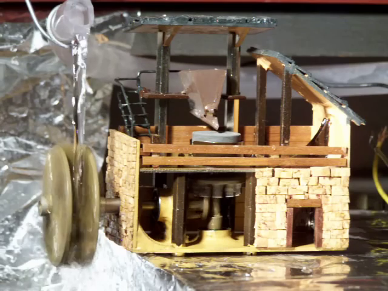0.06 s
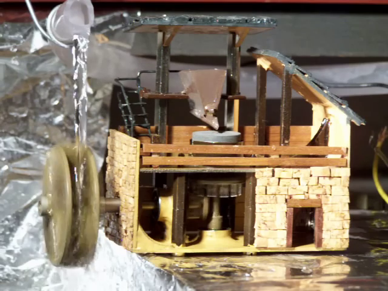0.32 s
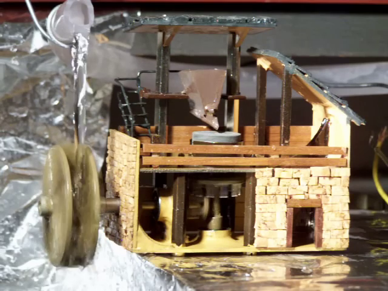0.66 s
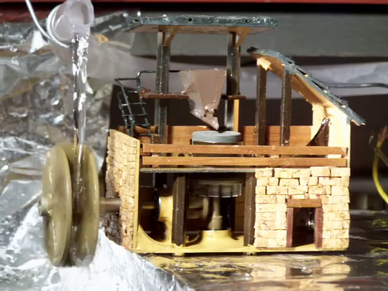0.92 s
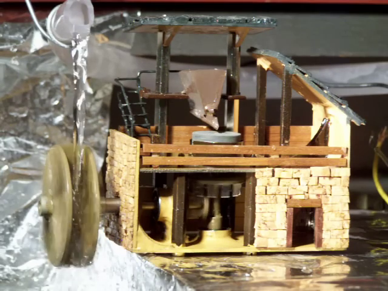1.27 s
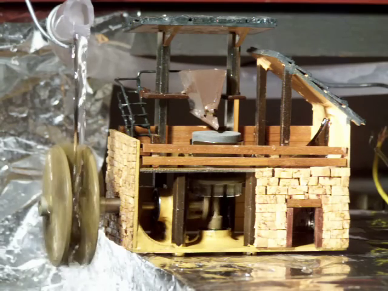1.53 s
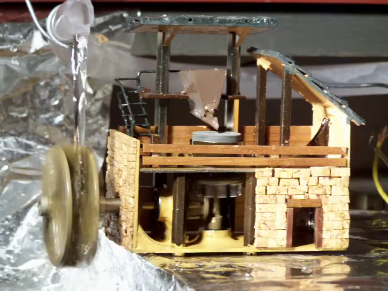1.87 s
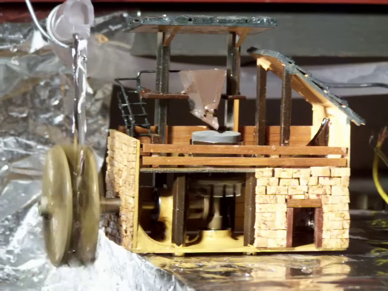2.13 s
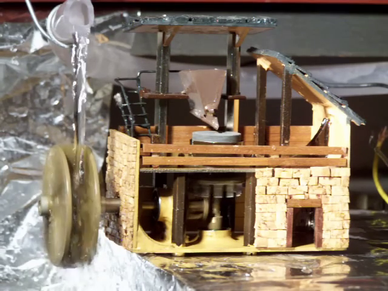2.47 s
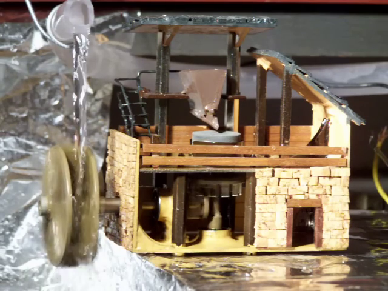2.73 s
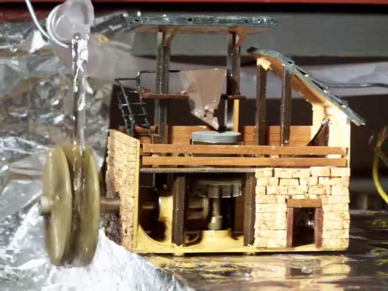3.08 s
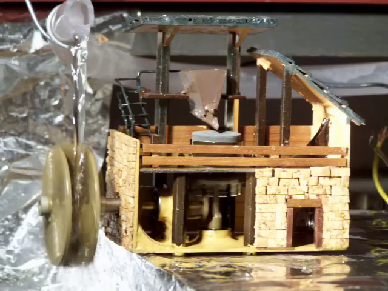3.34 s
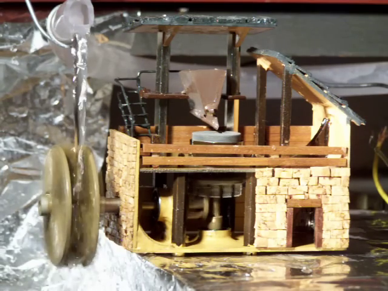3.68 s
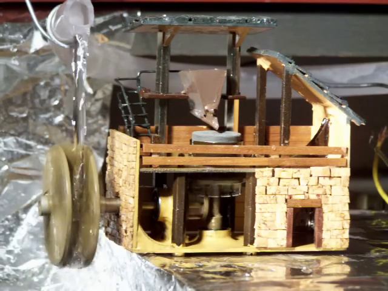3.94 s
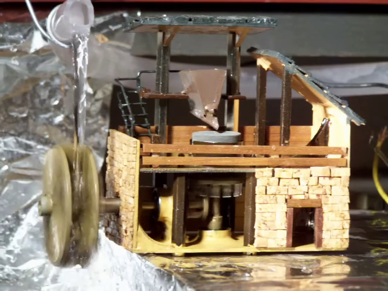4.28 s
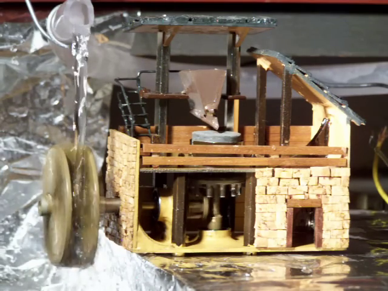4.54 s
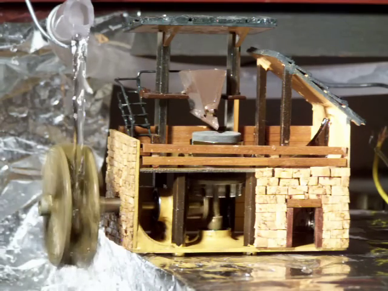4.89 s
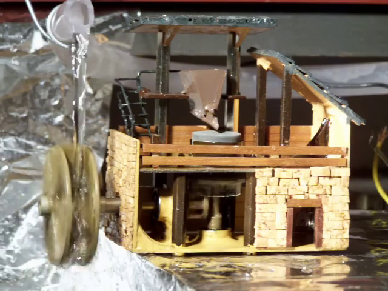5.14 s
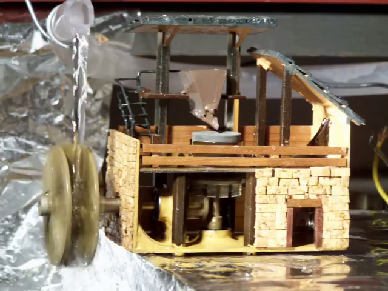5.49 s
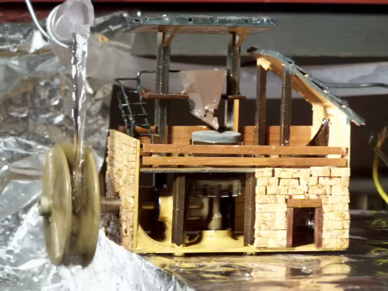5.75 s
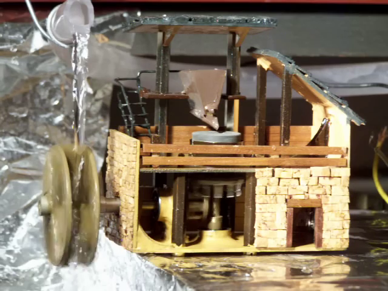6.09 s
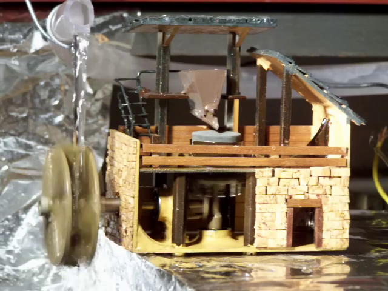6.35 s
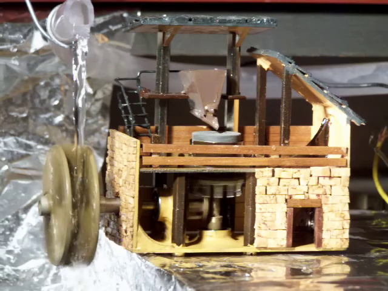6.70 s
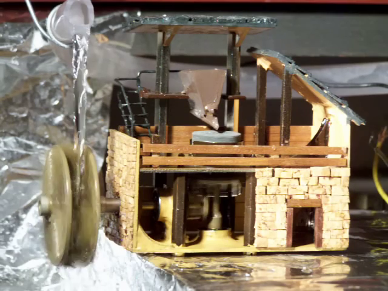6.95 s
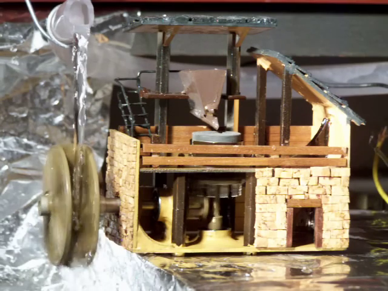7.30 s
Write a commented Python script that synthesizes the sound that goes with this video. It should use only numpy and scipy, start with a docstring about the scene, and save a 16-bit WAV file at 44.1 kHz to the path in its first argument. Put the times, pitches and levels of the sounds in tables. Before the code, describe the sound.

From the first moment, a thin stream of tap water splashes onto a small model mill wheel turning in a sink. The paddles break it into quick, bright, wet slaps, in a pattern that repeats about every 0.6 seconds. On each turn the axle gives a light knock with a faint, brief gear rattle. High bubble plinks and a fine fizz run through the splashing, with clearer plinks near 1.2, 2.5, 3.7, 4.4 and 6 seconds. Small rising gurgles appear around 1.3, 3.4, 5.6 and 6.2 seconds, and heavier blobs occasionally spill into the puddle. The wheel slows very slightly around 5 seconds but keeps going until the end, at roughly 7.5 seconds. Everything sounds close, with a slight basin ring, short echoes from the sink and nearby walls, and a very faint low room rumble.

```python
"""Water splashes in a quick, repeating rhythm: a thin stream from a tap turns a model mill in a sink.
Twelve unequal paddles chop the stream into the same pattern of slaps on every turn.
The falling water traps bubbles that plink, gurgle and fizz in the puddle.
The mill stands on foil, and its axle knocks once a turn.
The sink and nearby walls add short echoes, and the room rumbles faintly underneath."""
import sys
import numpy as np
from scipy import signal
from scipy.fft import rfft, irfft, next_fast_len
from scipy.io import wavfile
from scipy.ndimage import map_coordinates

SR = 44100
rng = np.random.default_rng(int(sys.argv[2]) if len(sys.argv) > 2 else 0)


def transcribe(signal):
    """Save signal, clipped to [-1, 1], as a 16-bit WAV file at the path in sys.argv[1]."""
    frames = np.atleast_2d(signal).T
    limited = np.clip(frames, -1, 1)
    pcm = np.round(limited * 32767).astype(np.int16)
    wavfile.write(sys.argv[1], SR, pcm)


N = 332073

# The wheel turns unevenly. One row a turn: when the stream meets three lead paddles, and the knock.
# Columns: first_paddle_s, second_paddle_s, third_paddle_s, knock_db
WHEEL_TURNS = [(0.017, 0.085, 0.375, -22.5), (0.583, 0.659, 0.968, -23), (1.186, 1.266, 1.559, -22),
               (1.761, 1.84, 2.123, -23.5), (2.325, 2.422, 2.688, -22.5), (2.9, 2.974, 3.267, -22.5),
               (3.459, 3.544, 3.811, -22), (4.016, 4.09, 4.374, -22.5), (4.577, 4.656, 4.985, -21.5),
               (5.242, 5.307, 5.638, -23), (5.866, 5.953, 6.267, -23.5), (6.487, 6.579, 6.865, -23),
               (7.076, 7.17, 7.457, -21.5)]
# The larger bubbles trapped by falling drops. Columns: start_s, pitch_hz, level_db
BIG_BUBBLES = [(0.146, 5000, -24.5), (0.209, 6530, -24.5), (0.45, 2400, -28), (0.459, 6200, -18.5),
               (0.516, 2080, -20), (0.712, 4610, -16.5), (0.874, 4800, -19), (1.012, 4380, -24.5),
               (1.2035, 6100, -23), (1.2261, 3200, -12), (1.2645, 794, -27), (1.271, 4900, -23),
               (1.365, 4000, -15.5), (1.398, 3660, -15), (1.412, 3480, -17.5), (1.5, 3570, -18.5),
               (1.903, 4210, -15.5), (1.982, 3120, -20), (2.121, 5450, -24.5), (2.333, 1464, -28),
               (2.486, 2093, -13), (2.659, 5280, -15), (2.691, 1460, -21), (2.774, 4830, -16.5),
               (3.301, 3450, -18.5), (3.401, 2430, -21), (3.461, 2940, -14), (3.584, 6140, -19.5),
               (3.683, 3500, -12.5), (3.741, 2070, -21), (3.812, 1010, -29), (3.862, 1360, -27.5),
               (3.932, 5970, -23), (4.382, 5570, -17.5), (4.445, 3620, -9.5), (4.625, 3700, -17),
               (4.802, 5090, -21.5), (4.9686, 4170, -19.5), (4.995, 2630, -22), (5.063, 3650, -22),
               (5.104, 3530, -23), (5.272, 3920, -20), (5.456, 2075, -20), (5.768, 3090, -15),
               (6.0077, 3125, -12.5), (6.445, 706, -33.5), (6.459, 4550, -17), (6.673, 5340, -19.5),
               (7.08, 1417, -25.5), (7.16, 4020, -16), (7.402, 1920, -29.5)]


def splashing(split_hz=2300):
    """Each slap starts with a smack and a thud, then bursts into a low body and a high spray of drops."""
    slaps = all_slaps()
    starts, body_db, spray_db = slaps.T
    # the stream breaks into blobs and wanders as it falls
    lumps_db = 2 * wobble(per_second=65) - 0.3 * wobble(per_second=3.82)
    body = slap_loudness(starts, body_db - 2.5, fade_s=0.22, attack_s=0.0022)
    thud = slap_loudness(starts, body_db - 1, fade_s=0.026, attack_s=0.0027)
    spray = slap_loudness(starts, spray_db - 3, fade_s=0.2, attack_s=0.00041)
    smack = slap_loudness(starts, spray_db - 5, fade_s=0.033, attack_s=0.0001)
    low_trickle, high_trickle = amp(lumps_db - 44), amp(lumps_db - 47)
    dips = lull(starts)
    low_drops = dips * np.sqrt(body ** 2 + thud ** 2 + low_trickle ** 2) * impacts(3000, spread_db=4)
    high_drops = dips * np.hypot(spray, high_trickle) * impacts(2200, spread_db=1)
    smack_drops = smack * impacts(6000, spread_db=10)
    low_share = lambda hz: 1 / (1 + (hz / split_hz) ** 8)
    return (splash_tone(low_drops, lambda hz: np.sqrt(low_share(hz)))
            + splash_tone(high_drops, lambda hz: np.sqrt(1 - low_share(hz)))
            + splash_tone(smack_drops, lambda hz: hz))  # tilted towards the treble


def all_slaps():
    """Water hits paddles, spills off the wheel and lands as drops. Columns: start_s, body_db, spray_db."""
    # Big blobs that splash down off the wheel. Columns: start_s, body_db, spray_db
    spills = [(1.411, -29.5, -25), (1.494, -34, -26.5), (2.686, -37, -25.5), (3.131, -35, -28),
              (3.461, -42, -26), (3.855, -30, -25.5), (4.561, -37, -22), (4.968, -36, -22.5),
              (5.49, -38, -23.5), (6.171, -30, -23), (6.447, -26.5, -28), (6.765, -31, -29),
              (7.013, -42, -27.5)]
    # each drop that traps a big bubble also splats, more quietly than the bubble rings
    splats = [(start_s, db - 25.5, db - 15.5) for start_s, _, db in BIG_BUBBLES]
    return np.vstack([paddle_slaps(), spills, splats])


def paddle_slaps(scatter_db=2.05):
    """Every paddle slaps the stream once a turn. No two blobs of water are alike, so the levels vary."""
    # The twelve unequal paddles. Columns: place_on_rim (0 to 1), body_db, spray_db
    paddles = [(0, -36.5, -29.5), (.137, -28, -32.5), (0.237, -33.5, -34.5), (.318, -39, -38.5),
               (.398, -35, -35), (0.482, -31.5, -34.5), (.56, -49.5, -46.5), (.638, -30.5, -31),
               (0.719, -30.5, -33), (0.804, -34.5, -35), (.888, -35, -38.5), (.965, -35, -44)]
    # The row numbers of the three paddles timed in WHEEL_TURNS.
    lead_paddles = [0, 1, 7]
    place, body_db, spray_db = np.transpose(paddles)
    lead_s = np.array(WHEEL_TURNS)[:, :-1]
    turn = np.arange(len(WHEEL_TURNS))[:, None]
    end_s = lead_s[-1, 0] + np.mean(np.diff(lead_s[:, 0]))
    lead_places = np.append(turn + place[lead_paddles], len(WHEEL_TURNS))
    starts = np.interp(turn + place, lead_places, np.append(lead_s, end_s))  # the rest fall in between
    size_db = scatter_db * bell_curve(starts.shape)
    return np.stack([starts, body_db + size_db, spray_db + size_db], axis=-1)[starts < N / SR]


def slap_loudness(starts, levels_db, fade_s, attack_s):
    """The loudness of all slaps over time: each rises quickly and dies away by 60 dB in fade_s."""
    power, t = np.zeros(N), np.arange(SR // 4) / SR
    onset = 1 - np.exp(-t / attack_s)
    for start_s, db in zip(starts, levels_db):
        add(power, start_s, (amp(db - 60 * t / fade_s) * onset) ** 2)
    return np.sqrt(power)


def lull(starts, depth_db=6, length_s=0.0081):
    """The water falls freely just before each slap, so the splashing thins out."""
    dip = np.zeros(N)
    for start_s in starts:
        add(dip, start_s - length_s, np.sqrt(np.linspace(0, 1, int(length_s * SR) + 1)))
    return amp(-depth_db * np.minimum(dip, 1))


def splash_tone(hits, band):
    """Give hits the tone of water in the basin, at about the same power; band picks low or high parts."""
    # How strong the splash is from bass to treble. Columns: pitch_hz, level_db
    splash_shape = [(40, -33), (120, -12.5), (180, -10), (255, -12), (325, -5.5), (500, -6.5),
                    (1000, -13.5), (2200, -9), (3300, 3.5), (4000, 3), (5000, -5), (7000, -13), (8300, -27),
                    (9500, -63)]
    # Pitches at which the wet wheel and basin ring. Columns: pitch_hz, width_hz, boost_db
    basin_rings = [(345.8, 21, 10.5), (434.3, 8.4, 13.5), (564, 21, 9), (700, 11.6, 15.5), (790, 13, 20.5),
                   (839.3, 12.5, 23.5), (870.4, 9.8, 21), (1170, 16, 4), (1180, 166, 11), (1608, 240, 8),
                   (1893, 120, 11), (2501, 36, 10), (2897, 125, 9), (3405, 840, 3)]

    def gain(hz):
        peaks = sum(amp(db) ** 2 / (1 + (2 * (hz - pitch_hz) / width_hz) ** 2)
                    for pitch_hz, width_hz, db in basin_rings)
        return unit(amp(read_curve(splash_shape, hz)) * np.sqrt(1 + peaks) * band(hz))
    return filtered(hits, gain)


def plinks(attack_s=0.00023, twin_db=-8, twin_ratio=1.117, tick_db=-10, tick_fade_s=0.00032):
    """Each drop ticks and traps a bubble with a smaller twin; small bubbles rise most in pitch."""
    out, t = np.zeros(N), np.arange(SR // 50) / SR
    bubbles = np.vstack([small_bubbles(), BIG_BUBBLES])
    chance = rng.uniform(0.7, 1.3, (len(bubbles), 2))
    for (start_s, hz, db), (lift, twin_gap) in zip(bubbles, chance):
        length_s = 0.022 * (2995 / hz) ** 1.28  # higher bubbles die sooner
        rise = lift * hz / 12000
        twin = bubble(hz * twin_ratio ** twin_gap, length_s / 2, rise, attack_s)
        tick = amp(db + tick_db - 60 * t / tick_fade_s) * rng.standard_normal(len(t))
        add(out, start_s, amp(db) * bubble(hz, length_s, rise, attack_s))
        add(out, start_s + 0.001 * twin_gap, amp(db + twin_db) * twin)
        add(out, start_s, tick)
    return out


def small_bubbles(count=22, low_hz=6100, high_hz=7300, level_db=-30, spread_db=4.5):
    """Stray drops trap small bubbles at random. Columns: start_s, pitch_hz, level_db."""
    when, pitch, strength = rng.random((count, 3)).T
    starts = (np.arange(count) + when) / count * N / SR
    hz = low_hz + (high_hz - low_hz) * pitch
    size_db = 20 * np.log10(np.mean(hz) / hz)  # smaller bubbles are higher and fainter
    return np.transpose([starts, hz, level_db + spread_db * (2 * strength - 1) + size_db])


def bubble(hz, length_s, rise, attack_s):
    """A bubble rings; as it nears the surface its pitch climbs and it fades ever faster."""
    t = np.arange(int(length_s * SR) + 2) / SR
    age = t / length_s
    phase = 2 * np.pi * hz * t * (1 + rise * (age - 0.1) / 2)
    fade = amp(-30 * age * (1 + 2 * age))
    return np.sin(phase) * fade * (1 - np.exp(-t / attack_s))


def gurgles(level_db=-1, cycles=23, end_pitch_ratio=1.55):
    """A shrinking pocket of air rings: the note swells and slides up, faster towards its end."""
    # Air pockets that close as they ring. Columns: start_s, start_pitch_hz, level_db
    air_pockets = [(1.281, 731, -27), (1.321, 2940, -23), (3.408, 2510, -15.5), (3.872, 1246, -30.5),
                   (5.496, 2550, -23.5), (5.644, 731, -24.5), (5.683, 1450, -24.5), (6.185, 2377, -17.5),
                   (6.572, 764, -33), (6.608, 1890, -27)]
    out = np.zeros(N)
    for start_s, start_hz, db in air_pockets:
        length_s, end_hz = cycles / start_hz, end_pitch_ratio * start_hz
        age = np.linspace(0, 1, int(length_s * SR) + 2)
        hz = 1 / ((1 - age) / start_hz + age / end_hz)  # half as wide means twice the pitch
        swell = np.sqrt(4 * age * (1 - age))
        add(out, start_s, amp(db + level_db) * swell * np.sin(2 * np.pi * np.cumsum(hz) / SR))
    return out


def fizz(count=380, level_db=-38, spread_db=6.5, cycles=32):
    """Many tiny bubbles chirp in the water running off the wheel; the smaller, the fainter."""
    out = np.zeros(N)
    pitches_hz = rng.uniform(2400, 7000, count)
    starts = rng.uniform(0, N / SR, count)
    sizes = np.mean(pitches_hz) / pitches_hz
    gains = sizes * amp(level_db + spread_db * bell_curve(count))
    for start_s, hz, gain in zip(starts, pitches_hz, gains):
        add(out, start_s, gain * bubble(hz, cycles / hz, rise=0.7, attack_s=0.00032))
    return out


def axle_knocks(level_db=-1, attack_s=0.003, rattle_db=-12, rattle_fade_s=0.073,
                rattle_top_hz=1500, low_cut_hz=215):
    """The axle catches and drops back once a turn: the frame rings and the loose gears rattle briefly."""
    # The notes of the mill's frame. Columns: pitch_hz, level_db, fade_s (time to fall by 60 dB)
    frame_notes = [(172.4, -10, 0.1), (353.7, -3.5, 0.077), (369.5, -2.5, 0.12), (429, -2, 0.078),
                   (574, -8.5, 0.085), (830, -19.5, 0.14), (1117, -7, 0.082), (1550, -12.5, 0.045)]
    knocks, shake, t = np.zeros(N), np.zeros(N), np.arange(SR // 4) / SR
    onset = 1 - np.exp(-t / attack_s)
    for turn_s, *_, knock_db in WHEEL_TURNS:
        start_s = turn_s + 0.00514  # the axle drops just after the first paddle is hit
        ring = sum(amp(db + rng.normal(0, 1) - 60 * t / fade_s) * np.cos(2 * np.pi * hz * t)
                   for hz, db, fade_s in frame_notes)
        add(knocks, start_s, amp(knock_db + level_db) * ring * onset)
        add(shake, start_s, amp(knock_db + rattle_db - 60 * t / rattle_fade_s) * onset)
    gear_clicks = shake * impacts(170, spread_db=5)
    rattle = splash_tone(gear_clicks, lambda hz: 1 / (1 + (hz / rattle_top_hz) ** 2))
    # the knocks carry little bass
    bass_cut = signal.butter(2, low_cut_hz, "highpass", fs=SR, output="sos")
    return signal.sosfilt(bass_cut, knocks + rattle)


def with_echoes(sound, early_db, tail_db, far_db, count=9, far_delay_s=0.022):
    """Sound bounces off the sink's sides and the far wall, and blurs into a short tail."""
    # How long the sink and walls echo. Columns: pitch_hz, fade_s (time to fall by 60 dB)
    echo_fades = [(200, 0.55), (900, 0.25), (3000, 0.21), (8000, 0.12)]
    hz, t, noise = signal.stft(rng.standard_normal(SR // 2), SR, nperseg=256)
    fade = amp(-60 * t / read_curve(echo_fades, hz)[:, None])
    tail = signal.istft(noise * fade, SR, nperseg=256)[1]
    tail = np.pad(tail, (SR // 250, 0))  # starts 4 ms late
    early = np.zeros(len(tail))
    bounces = rng.choice([-1, 1], count) / np.sqrt(count)
    delays_s = rng.uniform(0.001, 0.009, count)
    early[(delays_s * SR).astype(int)] = bounces
    echoes = amp(early_db) * early + amp(tail_db) * tail / np.linalg.norm(tail)
    echoes[int(far_delay_s * SR)] += amp(far_db)
    return sound + signal.fftconvolve(sound, echoes)[:N]


def room_rumble(level_db=-61):
    """The room adds a faint, steady, low noise."""
    # How strong the rumble is at each pitch. Columns: pitch_hz, relative_level_db
    rumble_shape = [(15, -16), (35, -3.5), (60, -13), (110, -15), (250, -13), (1000, -45.5)]
    noise = filtered(rng.standard_normal(N), lambda hz: amp(read_curve(rumble_shape, hz)))
    return amp(level_db) * unit(noise)


def impacts(per_second, spread_db):
    """Tiny hits of unequal size at random moments, scaled to an average power of 1."""
    hit = rng.random(N) < per_second / SR
    size = amp(spread_db * bell_curve(N))
    return unit(hit * size * rng.choice([-1, 1], N))


def wobble(per_second):
    """A smooth curve through per_second random values each second."""
    values = rng.standard_normal(int(N * per_second / SR) + 4)
    return map_coordinates(values, [np.arange(N) * per_second / SR])


def bell_curve(shape):
    """Random numbers, mostly near 0 and never beyond -2 or 2."""
    return np.clip(rng.standard_normal(shape), -2, 2)


def filtered(sound, gain):
    """Turn each pitch up or down by gain(hz)."""
    size = 2 * next_fast_len(N // 2 + SR // 4)
    hz = np.fft.rfftfreq(size, 1 / SR)
    log_response = irfft(np.log(np.maximum(gain(hz), 1e-6)))
    # fold the filter forward in time, so it rings after a hit and never before
    log_response[1:size // 2] *= 2
    log_response[size // 2 + 1:] = 0
    return irfft(rfft(sound, size) * np.exp(rfft(log_response)))[:N]


def read_curve(points, hz):
    """Read between rows of (pitch_hz, value), giving every octave equal room."""
    pitches_hz, values = np.transpose(points)
    return np.interp(np.log(hz + 1), np.log(pitches_hz), values)


def amp(db):
    """Turn decibels into a number to multiply by."""
    return 10 ** (np.asarray(db) / 20)


def unit(x):
    """Scale to an average power of 1."""
    return x / np.sqrt(np.mean(x ** 2) + 1e-20)


def add(track, start_s, sound):
    """Mix a sound into the track from start_s on."""
    start = int(np.clip(round(start_s * SR), 0, N - 1))
    track[start:start + len(sound)] += sound[:N - start]


def scene():
    """Water, bubbles and mill sound close together in the sink, over the room's rumble."""
    water = with_echoes(splashing(), early_db=-31.5, tail_db=-11.5, far_db=-23.5)
    bubbles = with_echoes(plinks() + gurgles() + fizz(), early_db=-6, tail_db=-5.5, far_db=-14.5)
    mill = with_echoes(axle_knocks(), early_db=-26.5, tail_db=-18.5, far_db=-19.5)
    return (water + bubbles + mill + room_rumble())[None]


def record(dry):
    """The highest treble is cut off steeply."""
    top_hz = 8500
    return signal.sosfilt(signal.cheby1(12, 0.2, top_hz, fs=SR, output="sos"), dry)


dry = scene()
out = record(dry)
transcribe(out)
```